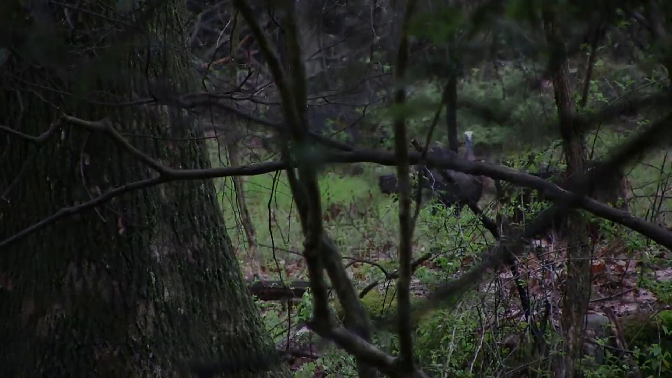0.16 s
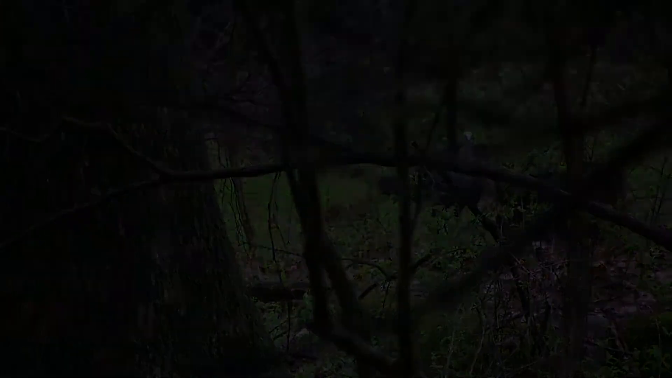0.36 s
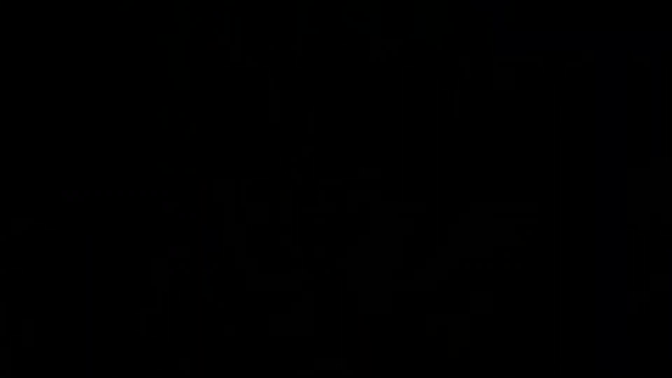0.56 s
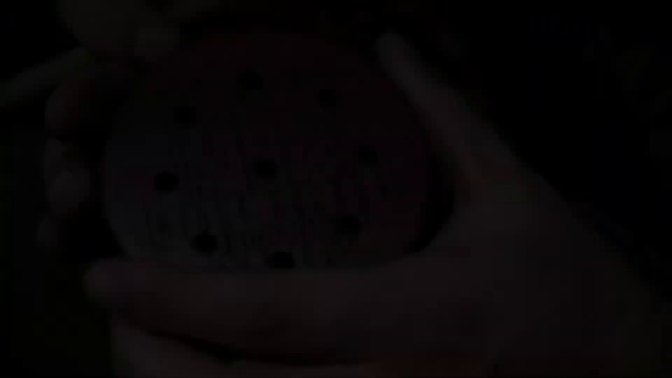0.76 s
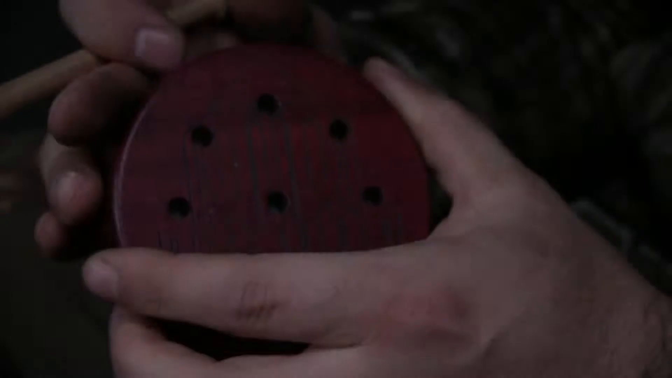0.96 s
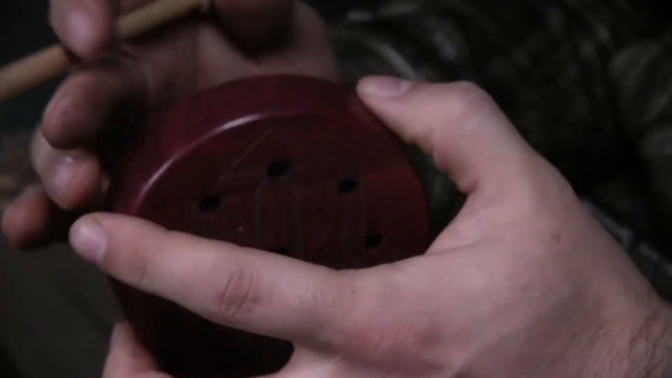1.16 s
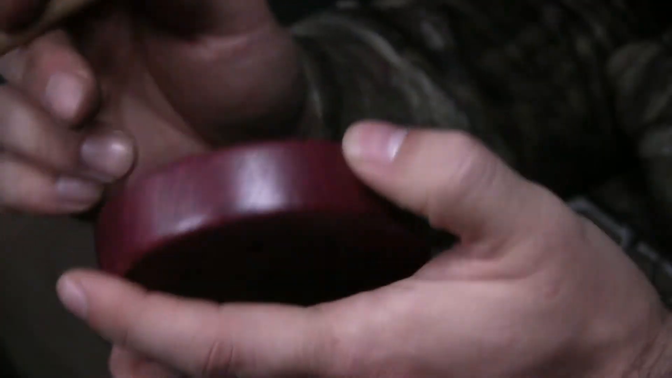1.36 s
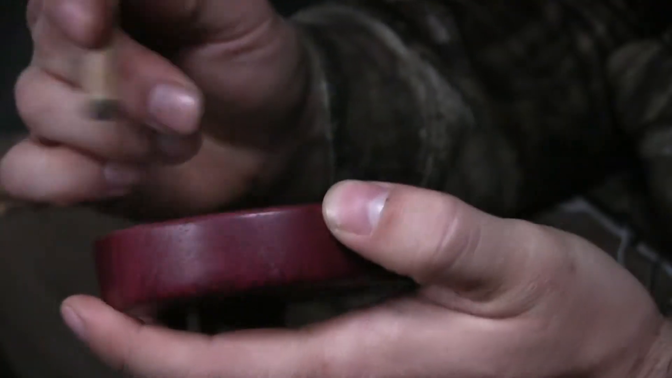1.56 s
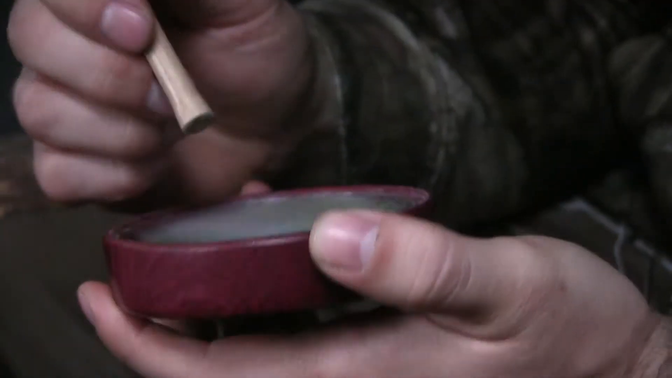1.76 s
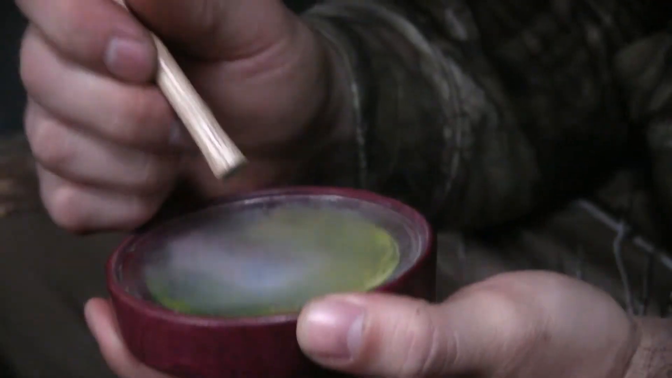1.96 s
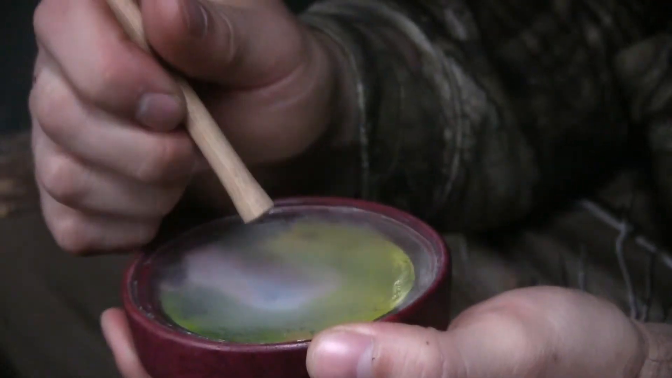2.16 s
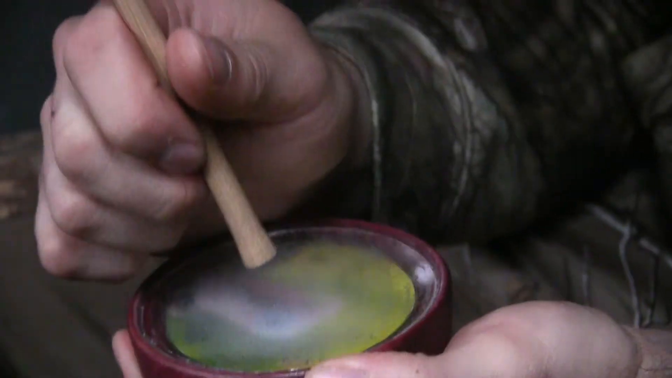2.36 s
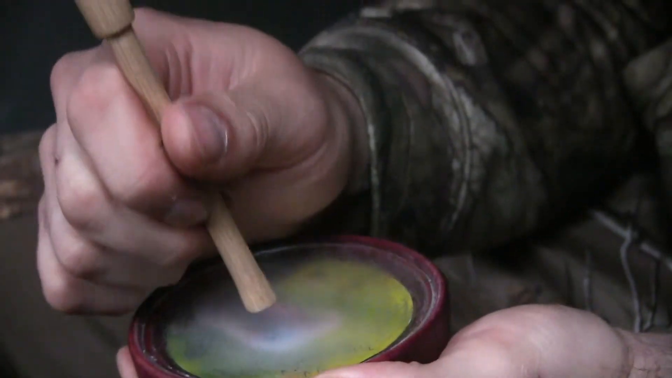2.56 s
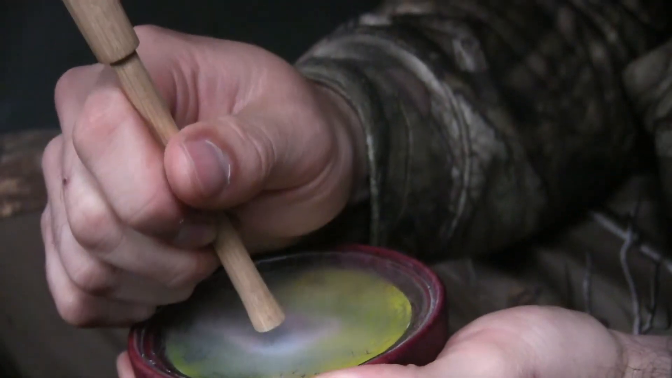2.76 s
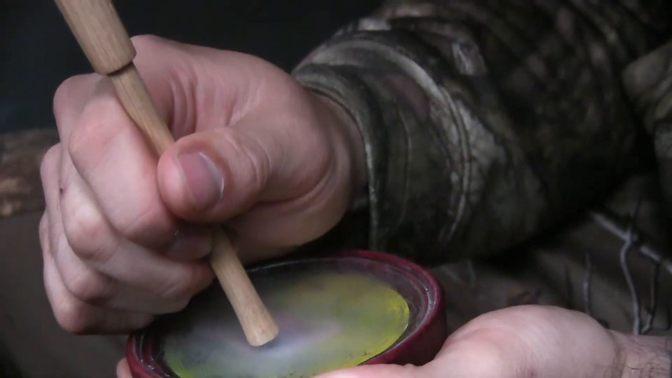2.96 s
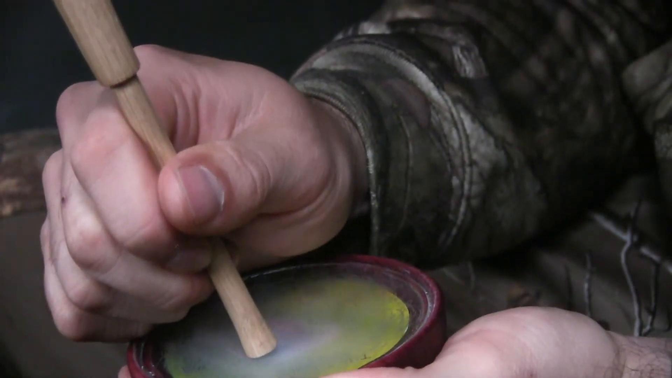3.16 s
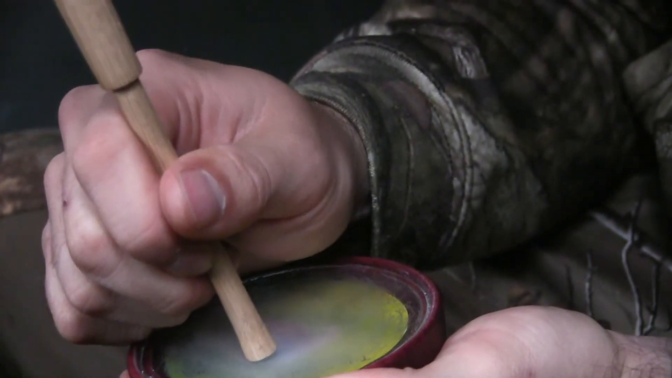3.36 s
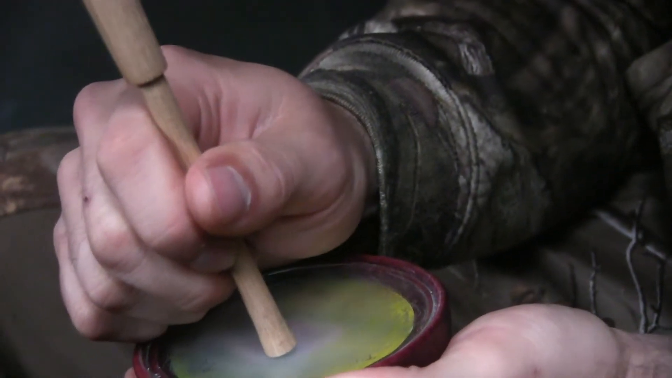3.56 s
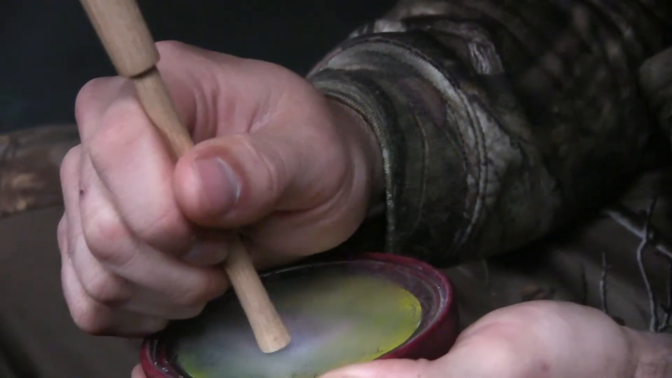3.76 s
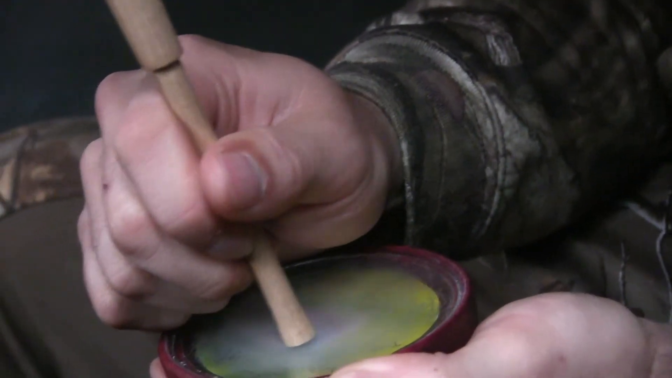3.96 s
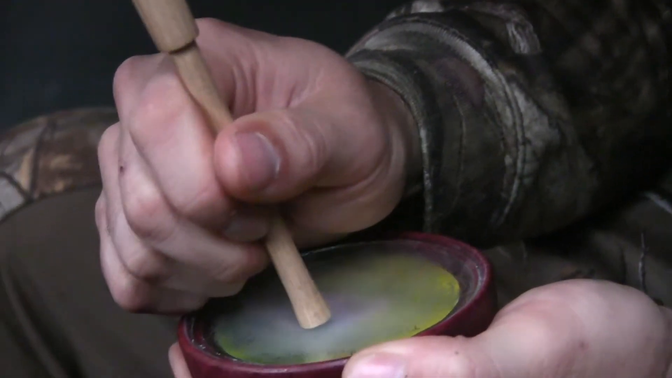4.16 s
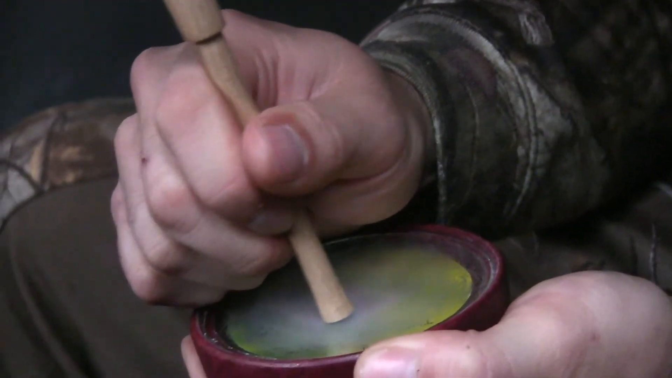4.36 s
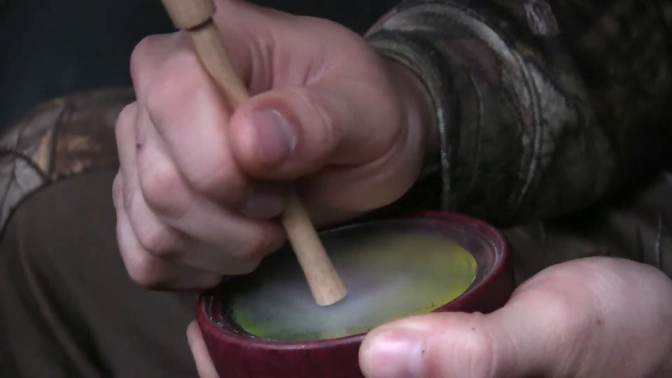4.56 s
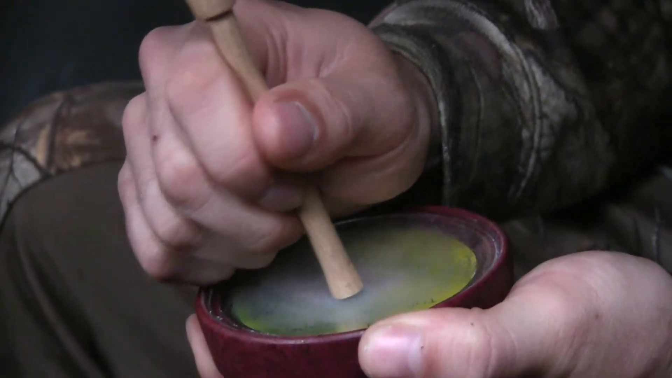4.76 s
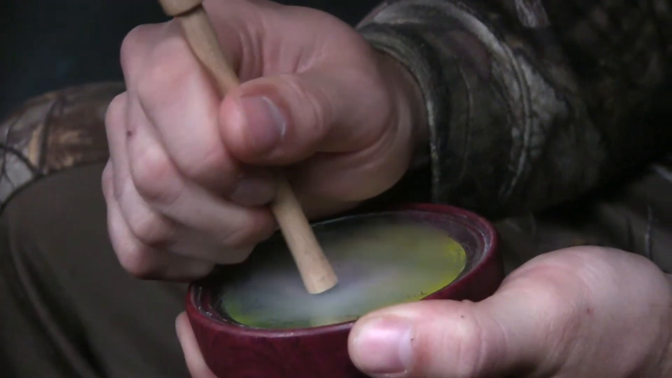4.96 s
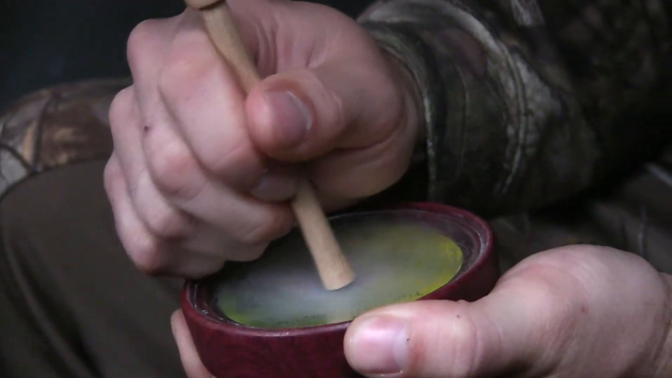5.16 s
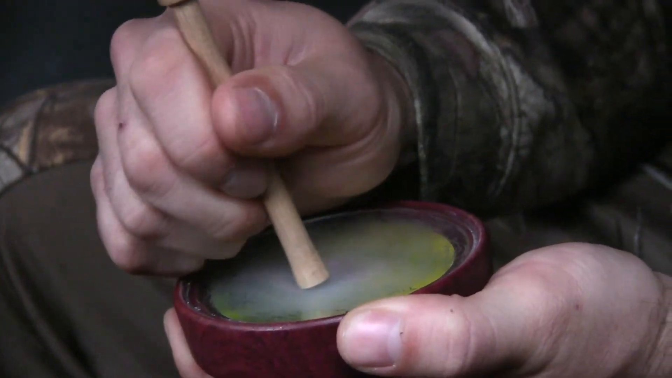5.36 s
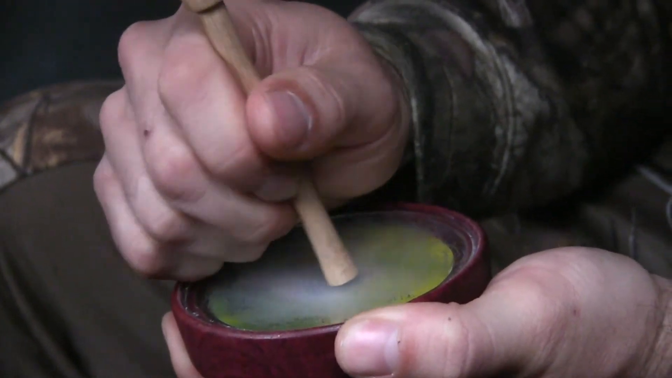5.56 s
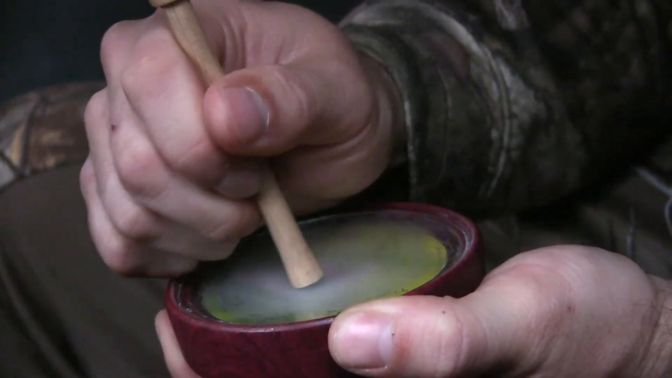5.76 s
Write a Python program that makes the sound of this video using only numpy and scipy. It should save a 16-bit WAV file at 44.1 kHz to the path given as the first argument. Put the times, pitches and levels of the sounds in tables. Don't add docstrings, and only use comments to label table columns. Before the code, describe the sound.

Close, dry and mono: soft cloth brushes, small snaps and faint high bird notes over wind rumble and leaf hiss for over three seconds. Then six loud, nasal, raspy turkey yelps from a striker rubbed on a pot call, the first broken and weaker, the later ones firmer, lower and longer. A boomy knock comes after the first; the background dips beneath the calls.

```python
import sys
import numpy as np
from scipy import signal
from scipy.fft import rfft, irfft
from scipy.io import wavfile
from scipy.ndimage import uniform_filter1d

SR = 44100
rng = np.random.default_rng(int(sys.argv[2]) if len(sys.argv) > 2 else 0)


def dump(signal):
    limited = np.clip(np.atleast_2d(signal).T, -1, 1)
    pcm = np.round(limited * 32767).astype(np.int16)
    wavfile.write(sys.argv[1], SR, pcm)


def makeup_ratio(level_db):
    decades = np.asarray(level_db, float) / 20
    return 10 ** decades


N = 257103

# (frequency [Hz], density [dB per Hz])
WIND_SPECTRUM = [(1.8, -30), (3.0, -4), (20, 0.5), (30, -19), (43, -2), (92, -19), (216, -55.5), (250, -28),
                 (320, -59.5), (550, -120)]
# (time [s], level [dB])
GUSTS = [(0.1, -15), (0.29, -22), (0.86, -28.5), (1.01, -19.5), (1.36, -26.5), (1.98, -16.5), (2.3, -25),
         (2.71, -19.5), (3.09, -21), (3.3, -16.5), (3.67, -22), (4.59, -12), (4.8, -18.5), (5.05, -5.5),
         (5.28, -27), (5.45, -15.5), (5.72, -28), (5.83, -8)]
# (frequency [Hz], density [dB per Hz])
WOODS_SPECTRUM = [(35, -22.5), (60, 4.5), (100, 2), (167, -4.5), (273, -12), (369, -15.5), (742, -19),
                  (1030, -19), (1270, -23), (1430, -22), (2740, -27), (3880, -41), (15700, -61)]
FLAP_DB, FLAP_SHARE, FLAP_WANDER_DB = -46, 0.28, -2
WOODS_DB, OPENING_DB, OPENING_S = -48, 5.5, 0.1

# (loudest at [s], level [dB], rise [dB/s], fall [dB/s])
RUSTLE = [
    (0.0, -41, 937, 918),
    (.55, -50.5, 250, 248),
    (1.06, -55.5, 30, 27),
    (1.43, -53.5, 30, 6),
    (1.86, -50.5, 31, 6),
    (2.73, -52.5, 207, 43),
    (3.4, -54.5, 9, 4),
]
# (frequency [Hz], density [dB per Hz])
RUSTLE_SPECTRUM = [(1180, 0.5), (2000, -44), (2380, -3), (2950, 6.5), (4580, -4.5), (5250, -7.5),
                   (12400, -16), (15700, -14)]
STILL_DB = -58.5

# (start [s], length [s], centre [Hz], width [octaves], level [dB])
SCUFFS = [(0.618, 0.18, 5400, 0.14, -73), (1.366, .14, 6100, .12, -66), (1.427, .1, 8640, .12, -70),
          (1.56, .14, 6000, .12, -71), (1.868, 0.13, 4800, .05, -61), (3.096, 0.13, 1700, 0.11, -56.5),
          (0.0, 0.16, 2940, 0.15, -56.5), (2.048, 0.059, 3000, 0.62, -50), (2.769, 0.058, 2880, 0.38, -46),
          (2.771, .1, 6350, .05, -74), (2.814, 0.05, 2400, .08, -54), (2.4, 0.97, 804, 0.22, -54),
          (5.452, 0.025, 705, 1.0, -41.5), (5.758, 0.034, 378, 0.08, -38.5), (3.431, .07, 1020, .1, -43.5),
          (3.75, .12, 4470, .12, -50)]

# (start [s], length [s], from [Hz], to [Hz], level [dB])
BIRD_NOTES = [(0.254, 0.12, 2710, 2600, -55), (.62, .05, 2620, 2700, -59), (0.645, 0.11, 2380, 2270, -55),
              (1.735, 0.1, 3860, 4660, -53.5), (1.805, 0.073, 4580, 4600, -52),
              (1.835, .04, 4500, 4100, -58), (1.8, .05, 2780, 2760, -56), (2.02, 0.185, 3830, 3845, -49),
              (2.2, 0.15, 3850, 3840, -60), (2.48, .09, 5950, 6170, -68), (2.563, .06, 6130, 6050, -66),
              (2.726, 0.078, 3920, 3865, -44), (2.815, 0.12, 3836, 3840, -50),
              (2.92, 0.25, 3860, 3780, -61)]
NOTE_FADE_DB = -4

# (time [s], peak level [dB], centre [Hz], width [octaves], t60 [s])
TICKS = [
    (.522, -47, 3700, .08, .03),
    (0.555, -37, 2700, 0.89, 0.042),
    (.554, -44, 1500, .2, .025),
    (.565, -49, 3400, 0.17, .03),
    (.77, -63, 9000, .6, .02),
    (2.179, -45, 6500, 0.69, .02),
    (2.72, -53, 4740, 0.34, .04),
    (3.17, -38, 1170, 0.2, 0.043),
]

# (frequency [Hz], density [dB per Hz])
GRIT_SPECTRUM = [(550, -17.5), (1050, -1.5), (1600, 2), (2000, -2.5), (2290, 2.5), (2650, -12.5), (2950, 3),
                 (3600, -15.5), (4600, -5.5), (5300, -20), (6050, -16), (7200, -27), (8400, -13.5),
                 (10500, -31)]
# (centre [Hz], width [Hz], level [dB])
SHEEN = (12200, 490, -24.5)
# (up to speed at [s], steady for [s], level [dB], fade [dB/s])
RETURNS = [
    (3.442, 0.015, -52.5, 152),
    (3.757, 0.084, -39, 302),
    (4.156, 0.087, -39.5, 148),
    (4.555, 0.057, -35.5, 118.5),
    (4.941, 0.072, -36, 100),
    (5.337, 0.073, -36.5, 223),
    (5.745, .09, -33.5, 89),
]
RETURN_RISE_DB_PER_S = 400
APPROACH_DB, APPROACH_DB_PER_S = -37.5, 266
PATCHY_DB = 2.0

# (catch [s], let-go [s], level [dB], pressure as tilt [dB/octave])
GRIPS = [
    [(3.504, 3.512, -22.5, -16.5), (3.517, 3.52, -16, -33), (3.527, 3.538, -16, -44),
     (3.543, 3.556, -13.5, -41.5), (3.572, 3.58, -15, -32), (3.585, 3.592, -7, -22),
     (3.604, 3.622, -8, -10), (3.626, 3.633, -15.5, -33), (3.661, 3.666, -14, -25)],
    [(3.993, 3.999, -14.5, -23), (4.0, 4.016, -6, -13.5), (4.024, 4.037, -26, -12),
     (4.043, 4.053, -7.5, -9), (4.069, 4.092, -8.5, -7), (4.095, 4.105, -14, -7.5)],
    [(4.39, 4.425, -7.5, -11), (4.43, 4.455, -8.5, -6), (4.459, 4.477, -7, -8), (4.484, 4.497, -9.5, -5.5)],
    [(4.772, 4.78, -17.5, -14), (4.789, 4.835, -8, -7.5), (4.838, 4.878, -8.5, -5)],
    [(5.166, 5.196, -7, -8), (5.198, 5.216, -7, -6.5), (5.22, 5.268, -8.5, -5.5),
     (5.272, 5.283, -15.5, 0.5)],
    [(5.515, 5.521, -21, -12), (5.533, 5.59, -7.5, -7.5), (5.592, 5.665, -9.5, -3.5),
     (5.669, 5.679, -16.5, 0.5)],
]
# (time [s], slip rate [Hz])
SLIPS = [
    [(3.44, 1059), (3.504, 885), (3.575, 880), (3.588, 849), (3.598, 877), (3.61, 807), (3.622, 837),
     (3.634, 950), (3.662, 861)],
    [(3.975, 927), (4.001, 834), (4.021, 798), (4.035, 898), (4.05, 770), (4.061, 897), (4.077, 746),
     (4.09, 797), (4.103, 880)],
    [(4.35, 915), (4.386, 882), (4.392, 825), (4.402, 769), (4.418, 756.4), (4.448, 767), (4.474, 834),
     (4.483, 824), (4.497, 840)],
    [(4.745, 1082), (4.765, 912), (4.784, 908), (4.79, 780), (4.797, 755), (4.831, 769.5), (4.839, 796),
     (4.865, 782), (4.883, 855)],
    [(5.13, 1081), (5.156, 880), (5.164, 907), (5.17, 819), (5.204, 755), (5.216, 799), (5.232, 735),
     (5.264, 745), (5.28, 841)],
    [(5.495, 876), (5.531, 876), (5.541, 784), (5.555, 752), (5.575, 739), (5.617, 701), (5.651, 725),
     (5.663, 746), (5.675, 832)],
]
# (frequency [Hz], width [Hz], level [dB])
POT_MODES = [(1220, 200, -10.5), (1590.4, 199, 8.5), (1700, 196, 9), (2020, 690, -12.5), (2356, 323, 1),
             (2914, 384, 7), (3039, 275, 8.5), (3530, 53, -21.5), (4330, 65, -40), (4571, 128, 0),
             (4916, 290, -14.5), (6390, 140, -31), (8180, 200, -33), (13400, 1500, -72.5)]
CATCH_DB_PER_S, LET_GO_DB_PER_S, EASE_S = 2802, 2103, 0.002
SQUEAK_DB, SQUEAK_DB_PER_S = -19, 606.5
BRIGHTEN_DB_PER_S = 44
LIFT_HZ_PER_S = 5200
LOOSE_HZ, LOW_DB_PER_HZ, LOW_LEAST_DB = 880, 0.27, -39
LOW_KEPT_DB = -33
LOW_MOST_DB = -18

KNOCK_S = 3.9269
# (frequency [Hz], level [dB], t60 [s])
SHELL = [(3320, -28, 0.043), (3820, -47, 0.068), (1736, -24, 0.037), (5470, -35, 0.036), (6430, -34, 0.039),
         (2400, -21, .03)]
# (frequency [Hz], density [dB per Hz])
RATTLE_SPECTRUM = [(530, -14.5), (900, -5.5), (1530, -18), (2080, -26), (2390, -7.5), (3210, -6),
                   (5650, -21.5), (15000, -37)]
# (delay [s], frequency [Hz], level [dB], t60 [s], rise [s])
SHUDDER = [
    (.0008, 152, 5, 0.024, 0.0013),
    (0.015, 39.3, -2, 0.21, 0.0043),
]

EDGE_HZ = 16100


def evened(x):
    return x / np.sqrt(np.mean(x ** 2) + 1e-20)


def read(points, hz):
    f, value = np.transpose(points)
    return np.interp(np.log(hz + 1), np.log(f + 1), value)


def follow(rows, t):
    s, *columns = np.transpose(rows)
    return [np.interp(t, s, c) for c in columns]


def add(mix, s, sound):
    part = mix[round(s * SR):][:len(sound)]
    part += sound[:len(part)]


def wander(n, hz):
    lowpass = signal.butter(2, hz, fs=SR, output="sos")
    return evened(signal.sosfilt(lowpass, rng.standard_normal(n + 2000))[2000:])


def coloured(x, gain):
    return evened(irfft(rfft(x) * gain(np.fft.rfftfreq(len(x), 1 / SR)), len(x)))


def peaked(t, s, db, rise, fall):
    return db - rise * np.maximum(s - t, 0) - fall * np.maximum(t - s, 0)


def echoes(x):
    t = np.arange(9000) / SR
    tail = rng.standard_normal(len(t)) * makeup_ratio(-60 * t / 0.09) * (t > .003)
    return signal.oaconvolve(x, tail / np.linalg.norm(tail))[:N]


def wind_on_microphone():
    blow = rng.standard_normal(N)
    gust_db = follow(GUSTS, np.arange(N) / SR)[0]
    push = coloured(blow, lambda hz: makeup_ratio(read(WIND_SPECTRUM, hz)) / (1 + (hz / 27) ** 4))

    def flap_gain(hz):
        return makeup_ratio(read(WOODS_SPECTRUM, hz)) / (1 + (38 / (hz + 1)) ** 4) / (1 + (hz / 250) ** 4)

    flap_db = FLAP_DB + FLAP_SHARE * (gust_db - gust_db.mean()) + FLAP_WANDER_DB * wander(N, 8)
    return push * makeup_ratio(gust_db - 4.5) + coloured(blow, flap_gain) * makeup_ratio(flap_db)


def leaves():
    t = np.arange(N) / SR
    hiss = coloured(rng.standard_normal(N), lambda hz: makeup_ratio(read(WOODS_SPECTRUM, hz)) / (1 + (250 / (hz + 1)) ** 4))
    return hiss * makeup_ratio(WOODS_DB + OPENING_DB * np.exp(-t / OPENING_S) + 0.3 * wander(N, 2.6))


def rustle():
    t = np.arange(N) / SR
    grains = rng.standard_normal(N) * makeup_ratio(0.76 * wander(N, 300))
    sound = coloured(grains, lambda hz: makeup_ratio(read(RUSTLE_SPECTRUM, hz)))
    moving = np.max([makeup_ratio(peaked(t, *row)) for row in RUSTLE], 0)
    return sound * np.maximum(makeup_ratio(STILL_DB), moving) * (t < 3.5)


def scuffs():
    out = np.zeros(N)
    for s, length, centre_hz, octaves, db in SCUFFS:
        noise = coloured(rng.standard_normal(SR),
                         lambda hz: np.exp(-(np.log2(hz / centre_hz + 0.0034) / octaves) ** 2))
        n = round(length * SR)
        add(out, s, makeup_ratio(db) * noise[:n] * signal.windows.tukey(n, .5))
    return out


def birds():
    out = np.zeros(N)
    for s, length, from_hz, to_hz, top_db in BIRD_NOTES:
        t = np.arange(s, s + length, 1 / SR)
        hz = np.linspace(from_hz, to_hz, len(t)) * (1 + 0.0071 * wander(len(t), 64))
        db = top_db + NOTE_FADE_DB * (t - s) / length + 1.8 * wander(len(t), 40)
        note = np.sin(2 * np.pi * np.cumsum(hz) / SR) * makeup_ratio(db)
        add(out, t[0], note * signal.windows.tukey(len(t), .3))
    return out + .45 * echoes(out)


def ticks():
    t, out = np.arange(3000) / SR, np.zeros(N)
    for s, db, centre_hz, octaves, t60 in TICKS:
        burst = coloured(rng.standard_normal(len(t)),
                         lambda hz: 1 / (1 + (np.log2(hz / centre_hz + 0.018) / octaves) ** 4))
        add(out, s, burst * makeup_ratio(db - 60 * t / t60))
    return out


def grit(hz):
    centre, width, db = SHEEN
    ring = makeup_ratio(db) / (1 + (2 * (hz - centre) / width) ** 2)
    return makeup_ratio(read(GRIT_SPECTRUM, hz)) / (1 + (hz / 14800) ** 8) + ring


def rub():
    t = np.arange(N) / SR
    sound = coloured(rng.standard_normal(N) * makeup_ratio(0.57 * wander(N, 340)), grit)
    z = signal.stft(sound, nperseg=256)[2]
    patches = uniform_filter1d(uniform_filter1d(rng.standard_normal(z.shape), 5, 0), 12, 1)
    sound = signal.istft(z * makeup_ratio(PATCHY_DB * evened(patches)), nperseg=256)[1][:N]
    drag, gripped = np.zeros(N), np.zeros(N)
    for s, hold, db, fall in RETURNS:
        off_steady = t - np.clip(t - s, 0, hold)
        drag += makeup_ratio(peaked(off_steady, s, db, RETURN_RISE_DB_PER_S, fall))
    for grips in GRIPS:
        first_catch, last_go = grips[0][0], grips[-1][1]
        drag += makeup_ratio(peaked(t, first_catch, APPROACH_DB, APPROACH_DB_PER_S, 1500))
        gripped += (t > first_catch) & (t < last_go + .018)
    return drag * uniform_filter1d(1. - gripped, size=600) * evened(sound)


def pot(hz):
    answer = 0
    for k, (f, w, db) in enumerate(POT_MODES):
        answer = answer + (-1) ** k * makeup_ratio(db) * 1j * w * hz / (f ** 2 - hz ** 2 + 1j * w * hz)
    return answer


def hand(grips, slips):
    t = np.arange(slips[0][0], grips[-1][1] + .04, 1 / SR)
    catch, go, db, tilt = np.transpose(grips)[:, :, None]
    late = np.maximum(t - go, 0)
    bite_db = CATCH_DB_PER_S * np.maximum(catch - t, 0)
    each = db - bite_db - LET_GO_DB_PER_S * late ** 2 / (late + EASE_S)
    tilt_db = np.take_along_axis(tilt + BRIGHTEN_DB_PER_S * (t - catch), each.argmax(0)[None], 0)[0]
    squeak = peaked(t, catch[0], np.minimum(SQUEAK_DB, db[0] - 8.5), SQUEAK_DB_PER_S, LET_GO_DB_PER_S)
    hz = follow(slips, t)[0] + LIFT_HZ_PER_S * late[-1]
    level_db = np.maximum(each.max(0), squeak)
    low_floor_db = np.maximum(LOW_LEAST_DB, LOW_KEPT_DB - level_db)
    low_db = np.maximum(LOW_DB_PER_HZ * (hz - LOOSE_HZ), low_floor_db)
    return t, level_db, hz, np.minimum(low_db, LOW_MOST_DB - level_db), tilt_db


def yelp(t, *controls):
    level_db, hz, low_db, tilt_db = (uniform_filter1d(c, size=90) for c in controls)
    level_db = np.minimum(level_db, -5.5)
    loose = np.clip((-12.5 - level_db) / 25, 0, 1)
    hz = uniform_filter1d(hz, size=120) * (1 + (0.0052 + 0.012 * loose) * wander(len(t), 150))
    turns = np.cumsum(hz) / SR
    k = np.arange(2, 20)[:, None]
    upper = pot(k * hz) * makeup_ratio(tilt_db * np.log2(k / 2)) / (1 + (k * hz / 12500) ** 6)
    upper *= makeup_ratio((.5 + .25 * k) * np.array([wander(len(t), 90) for _ in k]))
    upper *= np.exp(.03j * (k - 2) * np.array([wander(len(t), 315) for _ in k]))
    low = np.minimum(makeup_ratio(low_db), .97)
    upper *= np.sqrt((1 - low ** 2) / (abs(upper) ** 2).sum(0))
    stack = (upper * np.exp(2j * np.pi * k * turns)).sum(0).real
    tone = -np.sqrt(2) * (stack + low * np.cos(2 * np.pi * turns))
    puffs = (0.28 + np.exp(-(turns % 1) / 0.16)) * rng.standard_normal(len(t))
    rasp = (0.042 + 0.37 * loose ** 2) * coloured(puffs, grit)
    shaft = coloured(puffs, lambda f: 1 / (1 + ((f - 1050) / 90) ** 2) ** 2)
    shaft *= 0.0026 + 1.17 * loose * np.linspace(1, .6, len(t))
    level = makeup_ratio(level_db + 1.1 * wander(len(t), 70)) * signal.windows.tukey(len(t), .05)
    return t[0], level * ((1 - 0.3 * loose ** 3) * tone + rasp + shaft)


def yelps():
    out = np.zeros(N)
    for grips, slips in zip(GRIPS, SLIPS):
        add(out, *yelp(*hand(grips, slips)))
    return out


def knock():
    t, out = np.arange(8000) / SR, np.zeros(N)
    crack = sum(makeup_ratio(db - 60 * t / t60) * np.sin(2 * np.pi * hz * t) for hz, db, t60 in SHELL)
    rattle = coloured(rng.standard_normal(len(t)), lambda hz: makeup_ratio(read(RATTLE_SPECTRUM, hz)))
    hold_db = -24 - 60 * np.maximum(t - .018, 0) / 0.053
    add(out, KNOCK_S, crack + rattle * (makeup_ratio(hold_db) + makeup_ratio(-17 - 60 * t / 0.01)))
    for delay, hz, db, t60, rise in SHUDDER:
        swell = makeup_ratio(db - 60 * t / t60) * (1 - np.exp(-t / rise)) ** 2
        add(out, KNOCK_S + delay, swell * np.sin(2 * np.pi * hz * t))
    return out


def ducking(loud):
    power = loud ** 2 / makeup_ratio(-8) ** 2
    quick, slow = np.exp(-1 / (.05 * SR)), np.exp(-1 / (1.5 * SR))
    recent = signal.lfilter([1 - quick], [1, -quick], power)
    tired = signal.lfilter([1 - slow], [1, -slow], power)
    return makeup_ratio(-np.sqrt(uniform_filter1d(recent, size=600)) * 42 * tired)


def scene():
    call = yelps()
    near = scuffs() + rub() + call + makeup_ratio(-16.0) * echoes(call) + knock()
    end_fades = signal.windows.tukey(N, .004)
    around = end_fades * wind_on_microphone() + leaves() + rustle() + birds() + ticks()
    return (near + ducking(call) * around)[None]


def band_limit(x):
    return signal.sosfilt(signal.butter(12, 16430, fs=SR, output="sos"), x)


def record(dry):
    held = dry / (1 + abs(dry / .98) ** 5) ** .2
    edge = signal.firwin(255, EDGE_HZ, window=("kaiser", 9), fs=SR)
    mix = signal.oaconvolve(held, edge[None], "same") + 0.0013
    return band_limit(mix)


dry = scene()
out = record(dry)
dump(out)
```